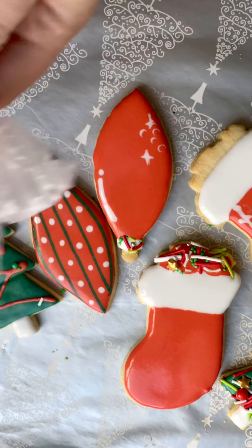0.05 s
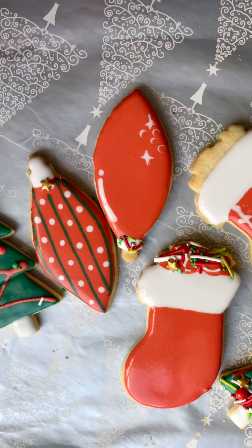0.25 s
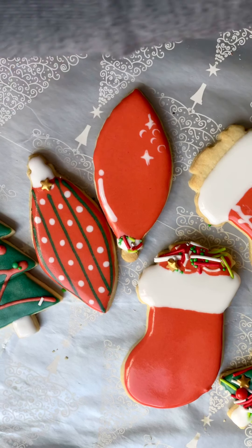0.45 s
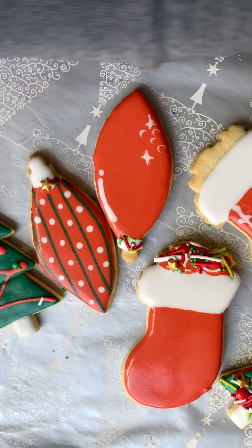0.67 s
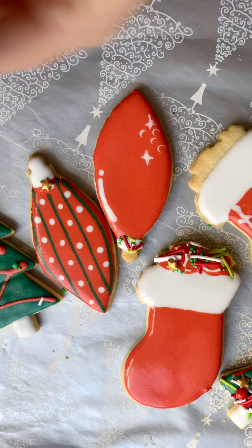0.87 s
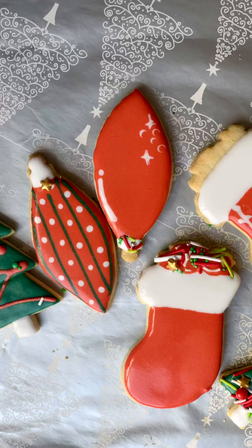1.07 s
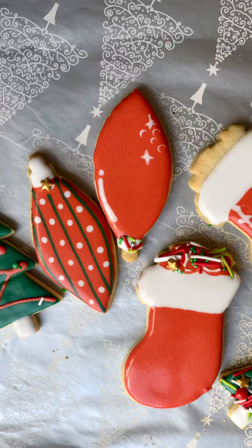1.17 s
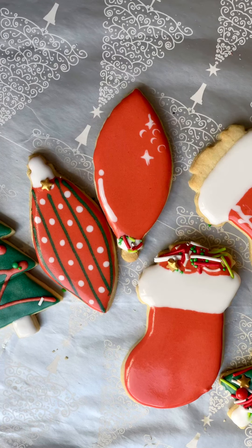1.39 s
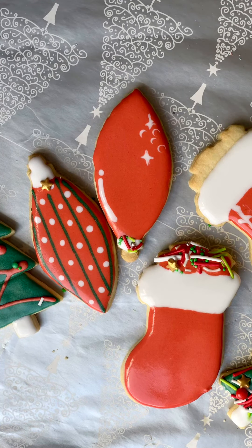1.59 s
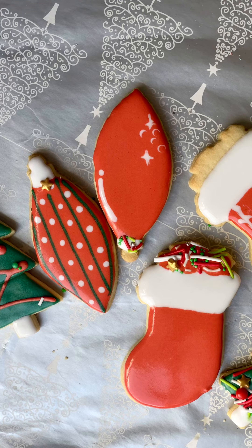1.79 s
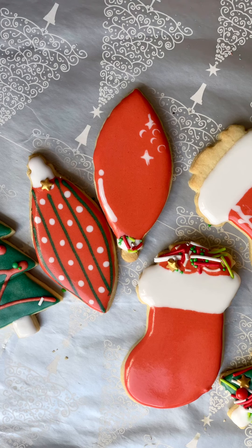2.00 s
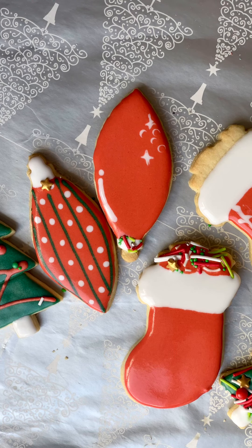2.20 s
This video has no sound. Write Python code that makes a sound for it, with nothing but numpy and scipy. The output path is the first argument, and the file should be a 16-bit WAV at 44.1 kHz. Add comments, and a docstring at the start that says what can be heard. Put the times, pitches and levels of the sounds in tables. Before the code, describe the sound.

Piping bags are set down on a wooden table, heard close in a quiet room with a faint low hum. A firm knock lands at 0.25 seconds, a weaker one at 0.37, with soft bumps, dull dragging and smooth film hiss. A light tap comes at 0.8. Faint rustling grows around 1.3, then crisp plastic crumpling and snaps peak from 1.7 to 2.1 before fading.

```python
"""Piping bags are set down on a wooden table with three knocks, dragged a little and crumpled.
Knocks and bumps ring table modes; the film gives hiss, crackle grains and snaps; the drag is
lumpy friction noise that rings the same modes. Behind: a quiet room, a low fuzzy hum and a faint
noise floor. A two-port microphone stands close by: phase lead between the ports, short room tail."""
import sys
import numpy as np
from scipy import signal
from scipy.fft import rfft, irfft
from scipy.io import wavfile
from scipy.ndimage import uniform_filter1d

SR = 44100
rng = np.random.default_rng(int(sys.argv[2]) if len(sys.argv) > 2 else 0)


def gain_from_db(level_db):
    """Convert decibel levels to linear amplitude factors (20 dB per decade)."""
    decades = np.asarray(level_db, float) / 20
    return 10 ** decades


def digitize_waveform(pressure):
    """Quantize a signal to 16-bit integers and store it at the path in sys.argv[1].

    Rows of a 2-D input are taken as channels; values are limited to [-1, 1].
    """
    field = np.atleast_2d(pressure).T
    bounded = np.clip(field, -1, 1)
    quanta = np.round(bounded * 32767).astype(np.int16)
    wavfile.write(sys.argv[1], SR, quanta)


N = 99225

# bag tips hitting the table: t/s, table peak/dB, spot on the top/0-1, thud gain/dB, tip hardness/Hz
TIP_KNOCKS = [(0.2455, -11.5, 0, -1, 2060), (0.3745, -21.5, 0.1, 1.5, 2210), (0.7984, -22, 0.51, -20, 1020)]
# soft bumps of hand and bag: t/s, peak/dB, spot on the top/0-1, hardness/Hz
SOFT_BUMPS = [(0.398, -26.5, 0, 410), (0.431, -40, .2, 400), (.498, -47.5, 0.3, 900),
              (.518, -40.5, .3, 500), (0.544, -37, .2, 250), (0.563, -40.5, .45, 200),
              (0.662, -38, 0.4, 696), (1.155, -46, 0, 605), (1.215, -53, 0.1, 202), (1.279, -45, 0, 900),
              (1.294, -45, 0, 900), (1.368, -48.5, .1, 800), (1.461, -48, 0.8, 600),
              (1.75, -47.5, 0.3, 500), (1.768, -39, 0, 510), (1.96, -43, 0.45, 600), (1.999, -47, 0.3, 500),
              (2.229, -59.5, .2, 500)]
# table modes: f/Hz, relative level/dB, t60/s
TABLE_MODES = [(77.7, 2.5, 0.039), (125.7, 0.5, 0.11), (137, -7.5, 0.072), (167.3, -19, 0.07),
               (226, -6, 0.052), (307, -0.5, .11), (401.7, -0.5, 0.11), (480, -15.5, 0.017),
               (592, -4.5, 0.085), (651.6, 7.5, 0.024), (894, 4, 0.032), (1184, 0.5, 0.03),
               (1286, 8, 0.011), (1487, 0.5, 0.023), (1614, -4, 0.015), (1833, -1, 0.033),
               (2380, -26, 0.0096)]
# single snaps of the film: start t/s, level before SNAP_TRIM_DB/dB, f/Hz, relative crack gain/dB
FILM_SNAPS = [(0.2001, -60.5, 2080, 4.5), (0.2166, -60, 2595, -3.5), (0.2484, -41.5, 1934, -14),
              (0.3731, -30, 2053, -1.5), (0.415, -43.5, 2520, 3.5), (0.5794, -65.5, 1870, 1),
              (0.6746, -47, 2250, 3), (0.6881, -48.5, 2020, 0.5), (0.7692, -47, 2420, -9.5),
              (0.782, -28.5, 2000, -12), (0.7919, -41, 2130, -12), (0.8032, -40, 5800, -0.5),
              (0.8731, -39, 3830, 6.5), (1.015, -58.5, 2500, 1), (1.06, -58, 2350, -7),
              (1.1083, -58.5, 3670, 6), (1.1542, -48, 2300, -17), (1.196, -56, 2200, 9.5),
              (1.2814, -46.5, 4400, 8.5), (1.298, -38.5, 1660, -2), (1.4143, -44.5, 2010, -15),
              (1.4426, -51.5, 2260, -5.5), (1.4616, -45.5, 2350, -17), (1.4937, -56, 2430, -16),
              (1.5176, -48, 2460, -31), (1.6576, -57, 2160, -1.5), (1.7701, -27, 3400, -3),
              (1.7807, -18.5, 6320, -12.5), (1.8229, -16.5, 6830, -5), (1.838, -32, 2750, 2.5),
              (1.9386, -26.5, 4900, 1), (1.956, -35, 1945, -4.5), (2.0375, -34, 3900, -9),
              (2.0496, -33, 3810, -4), (2.0675, -35, 3900, -7.5), (2.0813, -34.5, 3900, -11),
              (2.0999, -56, 1760, -11), (2.0989, -38, 5610, 6.5), (2.1147, -29.5, 6640, -2),
              (2.141, -36.5, 3200, -0.5), (2.156, -25.5, 6850, -3.5), (2.157, -43, 2160, -7),
              (2.1799, -38.5, 5970, -1), (2.181, -45.5, 1840, -0.5), (2.2163, -47.5, 2920, 1.5),
              (2.2288, -31.5, 6290, 1)]
# film spectrum: f/Hz, relative gain/dB
FILM_GAIN = [(150, 2.5), (400, -24), (1000, -7), (2000, 1), (4000, 2), (6500, 5), (9000, 9), (12000, -1),
             (15000, -12.5), (16300, -40.5)]
# film sliding: t/s, level before SLIDE_TRIM_DB/dB
SLIDE_LEVEL = [(0.0, -94), (0.23, -83.5), (0.28, -92), (0.394, -65), (0.45, -64), (0.586, -66.5),
               (0.732, -74), (0.918, -75.5), (1.0, -86.5)]
# film crumpling: t/s, level before CRUMPLE_TRIM_DB/dB
CRUMPLE_LEVEL = [(1.02, -68), (1.054, -84.5), (1.06, -77), (1.078, -82.5), (1.108, -68), (1.27, -56),
                 (1.294, -50), (1.41, -59.5), (1.454, -86), (1.46, -65.5), (1.506, -84.5), (1.52, -78.5),
                 (1.556, -88.5), (1.642, -89.5), (1.67, -58.5), (1.736, -43.5), (1.76, -50.5), (1.772, -37),
                 (1.808, -49), (1.824, -36.5), (1.866, -43), (1.93, -48.5), (1.934, -41.5), (1.996, -38),
                 (2.026, -45), (2.136, -57), (2.16, -58), (2.17, -60.5), (2.18, -57.5), (2.212, -63),
                 (2.232, -53), (2.25, -65.5)]
# friction spectrum: f/Hz, relative gain/dB
RUB_GAIN = [(40, -25.5), (80, 8.5), (130, -2.5), (300, 0), (650, -2), (1000, -12), (2000, -21.5),
            (4000, -48.5)]
# drag on the table: t/s, level/dB, bass gain/dB, relative scuff level/dB
DRAG_MOTION = [(0, -57.5, 12, -24), (.22, -62, 11, -23.5), (.25, -44.5, 5, -3), (.29, -38, 3.5, -23.5),
               (.36, -51.5, 10, -19), (.4, -42, 8.5, -32), (.48, -50.5, 12, -14), (.53, -46, 2.5, -8),
               (.61, -48.5, 3, -41), (.675, -54.5, -23, -33), (.72, -60, 8, -15), (.78, -63.5, 13, -5),
               (.8, -48, -18, -18), (.86, -50.5, -3, -15), (.92, -61, 9.5, -13.5), (1.01, -71.5, 10.5, -28),
               (1.17, -57.5, 1.5, -15), (1.25, -65.5, 12.5, -10), (1.3, -54.5, -20, -20),
               (1.33, -60, 5.5, -5), (1.48, -59.5, 3, -16), (1.56, -77, 8.5, -5.5), (1.64, -75, 16, -27),
               (1.68, -60, -10, -0.5), (1.79, -49.5, 6, -2.5), (1.93, -56.5, -2, -31), (1.97, -49, -18, 5),
               (2.08, -66, -12, -15), (2.25, -65.5, 7.5, -2.5)]
# noise floor spectrum: f/Hz, relative gain/dB
FLOOR_GAIN = [(38, -21), (65, -0.5), (84, -11.5), (112, -26), (193, -32), (487, -45.5), (572, -44.5),
              (2490, -65.5), (8000, -68), (10400, -102), (17600, -120)]
# port pair: f/Hz, phase by which left leads/rad
PORT_LEAD = [(20, 0), (150, -.06), (350, -.2), (780, -.55), (1380, -.3), (2580, .4), (4200, .7),
             (5700, 1.6), (7600, 2.4), (8600, 3.05), (11600, 3.22), (14000, 4.2), (16200, 5.5)]
# room tail: f/Hz, gain/dB
ROOM_GAIN = [(40, -43.5), (100, -44), (300, -19), (700, -4.5), (1400, -11), (3000, -4), (5000, -11),
             (9000, -14), (13000, -13), (16000, -16)]

TRAVEL_CYCLES = 1.93  # bending waves: each mode arrives this many cycles late
SPOT_HZ, THUD_HZ = 900, 250
TICK_DB, TICK_LEAD_S, TICK_HZ = -19, 0.0038, 3200
WASH_DB, WASH_T60_S, WASH_HZ = -31, 0.28, 1200
SNAP_CYCLES, SNAP_T60_S, SNAP_TRIM_DB, SNAP_TOP_HZ = 2.46, 0.015, 0.5, 13400
GRAINS_PER_S, GRAIN_SPREAD_DB, GRAIN_CYCLES = 2500, 1.5, 3.11  # rate before the clump gains
CLUMP_DB, PATCH_DB = 2, 6
HISS_DB, CRUMPLE_TRIM_DB, SLIDE_TRIM_DB = -5.5, 3, 6.5
RUB_LUMP_DB, RING_LUMP_DB, RING_DB = 2.5, 6, -2.5
SCUFF_HZ, SCUFF_WIDTH_HZ = 1500, 750
HUM_HZ, HUM_DB, HUM_WIDTH_HZ, HUM_FUZZ_DB = 49.1, -59, 5, -9.5
HUM_WAVER_RAD = 0.481  # rms
FLOOR_DB = -76  # rms in 70-8000 Hz
ROOM_T60_S = 0.047
MIC_LOW_HZ, MIC_TOP_HZ = 37, 16300


def knocks():
    """A tick of the tip, then the table rings over a short dull wash; bumps are softer blows."""
    out = np.zeros(N)
    t = np.arange(SR // 2) / SR
    lowpass = signal.butter(4, WASH_HZ, fs=SR, output="sos")
    for s, db, spot, thud_db, hard_hz in TIP_KNOCKS:
        wash = evened(signal.sosfilt(lowpass, rng.standard_normal(len(t))))
        wash = gain_from_db(WASH_DB - 60 * t / WASH_T60_S) * np.minimum(t / 0.018, 1) * wash
        add(out, s, gain_from_db(db) * (table(spot, thud_db, hard_hz) + wash))
        add(out, s - TICK_LEAD_S, gain_from_db(db + TICK_DB) * snap(TICK_HZ, -5.5))
    for s, db, spot, hard_hz in SOFT_BUMPS:
        add(out, s, gain_from_db(db) * table(spot, 0, hard_hz))
    return out


def table(spot, thud_db, hard_hz):
    """Modes weighted by spot and tip; bending waves line them up as one front falling in pitch."""
    hz, db, t60 = np.transpose(TABLE_MODES)[:, :, None]
    clock = np.arange(SR // 2) / SR
    t = np.maximum(clock - 0.78 * TRAVEL_CYCLES / hz, 0)
    place = np.cos(np.pi * spot * hz / SPOT_HZ)
    thud = gain_from_db(thud_db / (1 + (hz / THUD_HZ) ** 2))
    softness = 1 + (hz / hard_hz) ** 4.7
    envelope = gain_from_db(db - 60 * t / t60) * (1 - np.exp(-(3.3 * t * hz) ** 2))
    phase = 2 * np.pi * (hz * clock - TRAVEL_CYCLES * (1 + np.log(hz / 1350)))
    out = (place * thud / softness * envelope * np.cos(phase)).sum(0)
    return out / abs(out).max()


def film():
    """Smooth hiss while the film slides, clumped crackle while it crumples; single snaps on top."""
    clump = lumps(CLUMP_DB, size=150)
    hiss = evened(coloured(np.sqrt(clump) * rng.standard_normal(N), FILM_GAIN))
    crackle = evened(coloured(grains(clump), FILM_GAIN))
    crumple = evened(crackle + gain_from_db(HISS_DB) * hiss)
    level = gain_from_db(curve(list(SLIDE_LEVEL) + list(CRUMPLE_LEVEL)))
    crumpling = np.arange(N) / SR > CRUMPLE_LEVEL[0][0]
    out = level * np.where(crumpling, gain_from_db(CRUMPLE_TRIM_DB) * crumple, gain_from_db(SLIDE_TRIM_DB) * hiss)
    for s, db, hz, crack_db in FILM_SNAPS:
        add(out, s, gain_from_db(db + SNAP_TRIM_DB) * snap(hz, crack_db))
    return out


def grains(clump):
    """Random short tone bursts at 30 pitches; each pitch has its own dense patches."""
    out = np.zeros(N)
    for hz in np.geomspace(500, 13000, 30):
        chance = clump * lumps(PATCH_DB, size=400) * GRAINS_PER_S / 30 / SR
        size = gain_from_db(GRAIN_SPREAD_DB * np.minimum(rng.exponential(1, N), 4))
        train = (rng.random(N) < chance) * size * rng.choice([-1, 1], N)
        u = np.arange(0, 4, hz / SR / GRAIN_CYCLES * 2)
        grain = np.sqrt(hz) * np.exp(-(u - 2) ** 2) * np.sin(np.pi * GRAIN_CYCLES * u)
        out += signal.oaconvolve(train, grain)[:N]
    return out


def snap(hz, crack_db):
    """A few cycles of the crease's pitch with a wide noise crack."""
    t = np.arange(1500) / SR
    band = signal.butter(2, [0.58 * hz, SNAP_TOP_HZ], "band", fs=SR, output="sos")
    crack = signal.sosfilt(band, rng.standard_normal(len(t)))
    crack = crack * gain_from_db(crack_db - 60 * t / SNAP_T60_S) * np.clip(t / 0.00024, 0, 1) ** 2
    tone = np.exp(-(2 * t * hz / SNAP_CYCLES - 2) ** 2) * np.sin(2 * np.pi * hz * t)
    return tone + crack


def drag():
    """Lumpy friction rings the table at four spots; pressing adds bass, skidding a bright scuff."""
    rub = rng.standard_normal(N) * lumps(RUB_LUMP_DB, size=600)
    ring = np.zeros(N)
    for spot in (0.15, 0.45, 0.7, 1.1):
        force = rng.standard_normal(N) * lumps(RING_LUMP_DB, size=1500)
        ring += signal.oaconvolve(force, table(spot, 0, 840))[:N]
    out = evened(evened(coloured(rub, RUB_GAIN)) + gain_from_db(RING_DB) * evened(ring))
    bass = signal.lfilter(*signal.butter(2, 220, fs=SR), out)
    scuff = evened(signal.lfilter(*signal.iirpeak(SCUFF_HZ, SCUFF_HZ / SCUFF_WIDTH_HZ, SR), rub))
    pressed = out + (gain_from_db(curve(DRAG_MOTION, axis=2)) - 1) * bass
    return gain_from_db(curve(DRAG_MOTION)) * (pressed + gain_from_db(curve(DRAG_MOTION, axis=3)) * scuff)


def room_tone():
    """A low hum, wavering in phase and fuzzed by narrow noise, over a faint shaped floor."""
    phase = 2 * np.pi * HUM_HZ * np.arange(N) / SR + HUM_WAVER_RAD * wander(size=3000)
    r = np.exp(-np.pi * HUM_WIDTH_HZ / SR)
    noise = rng.standard_normal(N) + 1j * rng.standard_normal(N)
    fuzz = signal.lfilter([1], [1, -2 * r, r * r], noise)
    hum = evened((np.exp(1j * phase) * (1 + gain_from_db(HUM_FUZZ_DB) * fuzz / np.std(fuzz))).real)
    floor = coloured(rng.standard_normal(N), FLOOR_GAIN)
    band = signal.butter(2, [70, 8000], "band", fs=SR)
    return gain_from_db(HUM_DB) * hum + gain_from_db(FLOOR_DB) * floor / np.std(signal.lfilter(*band, floor))


def wander(size):
    """Slow random signal of rms 1: noise averaged twice over size samples."""
    once = uniform_filter1d(rng.standard_normal(N), size=size)
    return evened(uniform_filter1d(once, size=size))


def lumps(spread_db, size):
    """A gain that wanders at random, rms spread in dB."""
    return gain_from_db(spread_db * wander(size))


def evened(x):
    """Scales x to rms 1."""
    return x / np.sqrt(np.mean(x ** 2) + 1e-20)


def curve(rows, axis=1):
    """Interpolates one table column over time."""
    rows = np.array(rows)
    return np.interp(np.arange(N) / SR, rows[:, 0], rows[:, axis])


def read(points, hz):
    """Interpolates a table over log frequency."""
    f, value = np.transpose(points)
    return np.interp(np.log(hz + 1), np.log(f + 1), value)


def coloured(x, points):
    """Filters x by a table of f/Hz, gain/dB."""
    gain = gain_from_db(read(points, np.fft.rfftfreq(x.shape[-1], 1 / SR)))
    return irfft(rfft(x) * gain, x.shape[-1])


def add(mix, s, sound):
    """Adds sound to mix in place from s seconds."""
    part = mix[max(round(s * SR), 0):][:len(sound)]
    part += sound[:len(part)]


def scene():
    """Direct sound reaches the two ports with a phase lead; the room adds a short tail to each."""
    dry = knocks() + film() + drag() + room_tone()
    lead = np.exp(0.5j * read(PORT_LEAD, np.fft.rfftfreq(N, 1 / SR)))  # half the phase per port
    direct = irfft(rfft(dry) * np.array([lead, 1 / lead]), N)
    t = np.arange(8192) / SR
    tail = rng.standard_normal((2, len(t))) * gain_from_db(-60 * t / ROOM_T60_S) * np.minimum(t / 0.004, 1)
    tail = tail / np.linalg.norm(tail[0])
    room = signal.fftconvolve(dry[None], tail, axes=1)[:, :N]
    return direct + coloured(room, ROOM_GAIN)


def roll_off(x):
    """The treble ends steeply here."""
    return signal.sosfilt(signal.butter(12, 16300, fs=SR, output="sos"), x)


def record(dry):
    """The microphone cuts the deepest bass and the top treble."""
    mix = signal.oaconvolve(dry, signal.firwin(255, MIC_TOP_HZ, fs=SR)[None], "same")
    mix = signal.sosfilt(signal.butter(3, MIC_LOW_HZ, "high", fs=SR, output="sos"), mix)
    return roll_off(mix)


dry = scene()
out = record(dry)
digitize_waveform(out)
```